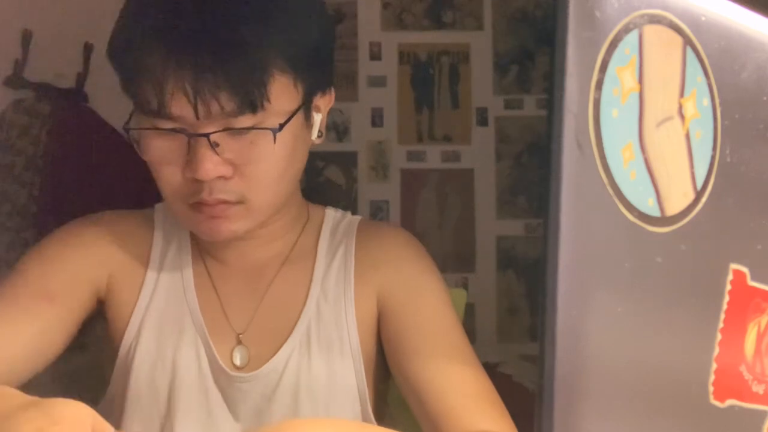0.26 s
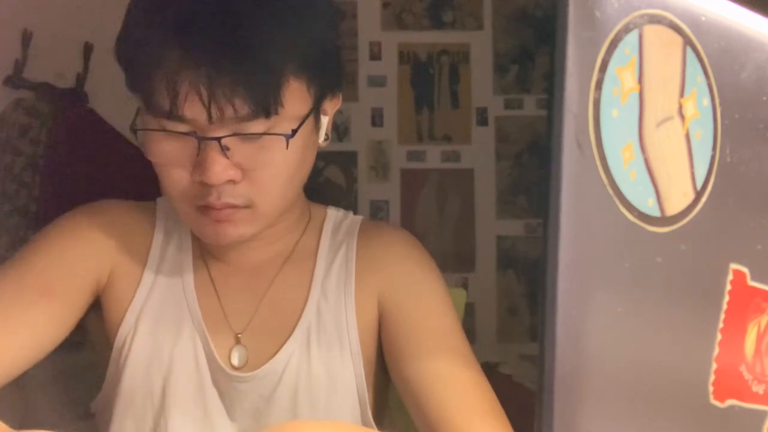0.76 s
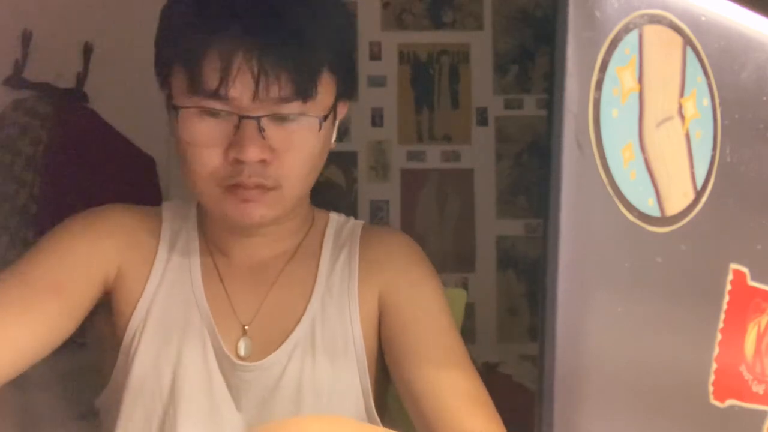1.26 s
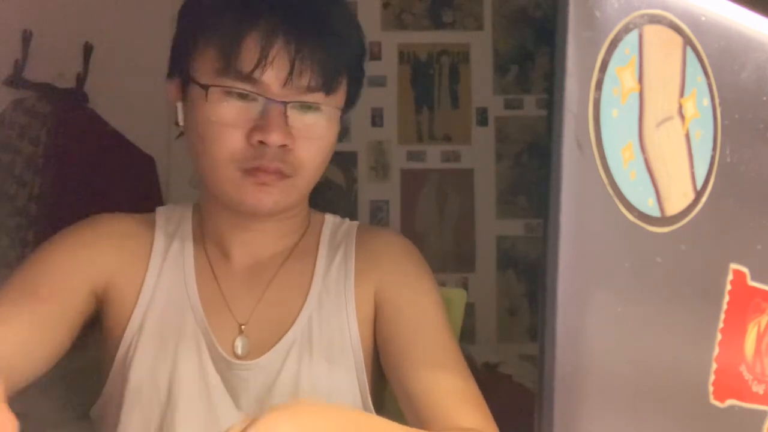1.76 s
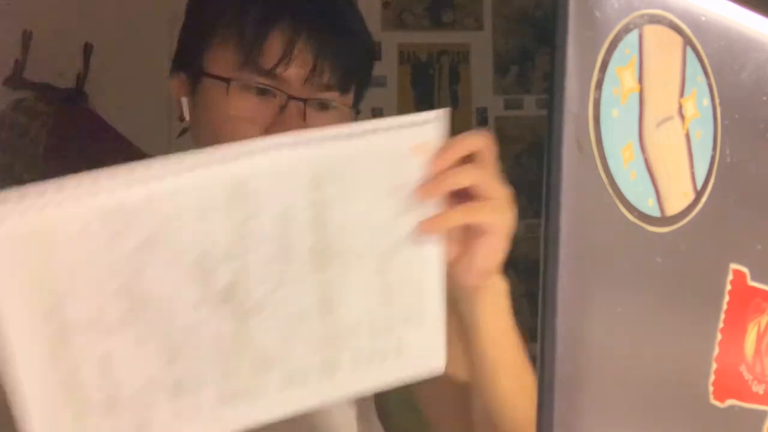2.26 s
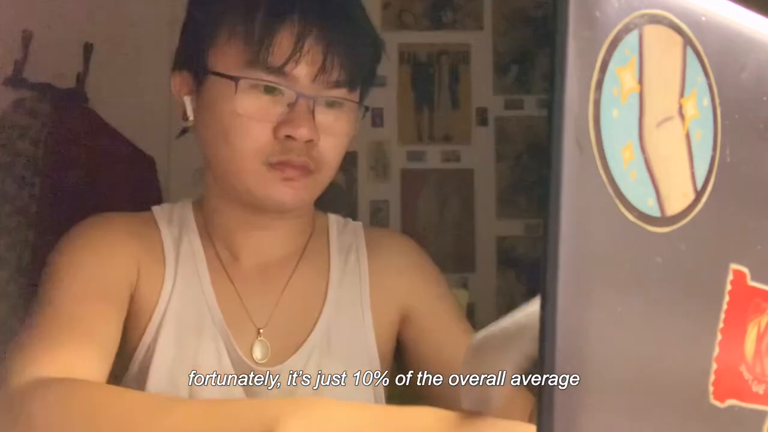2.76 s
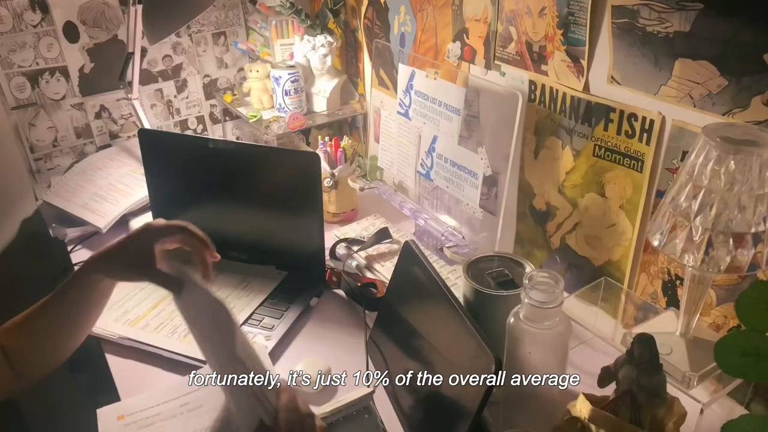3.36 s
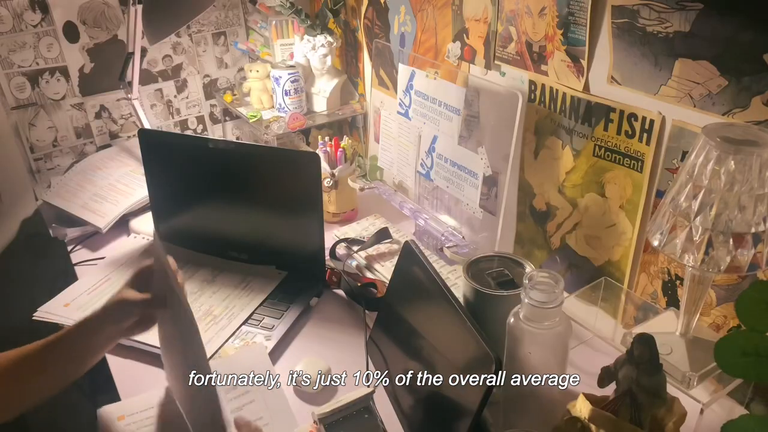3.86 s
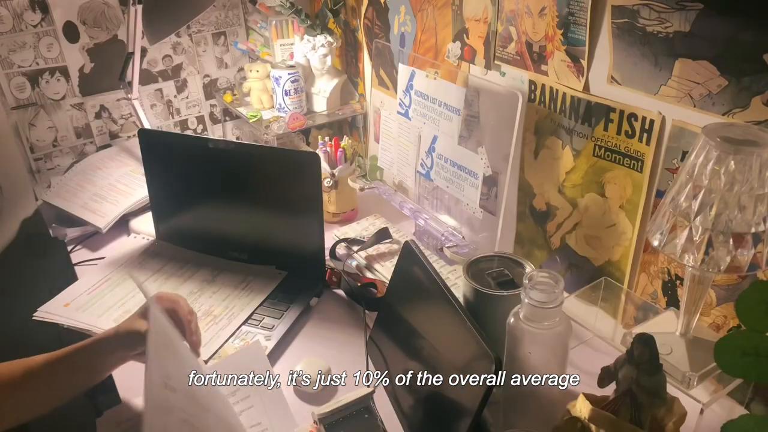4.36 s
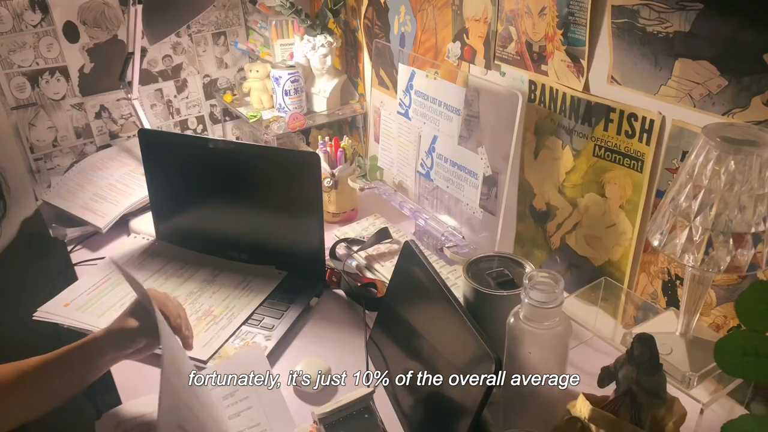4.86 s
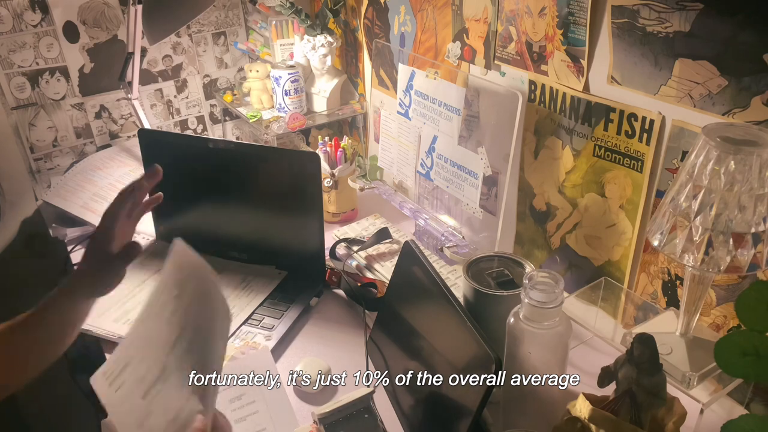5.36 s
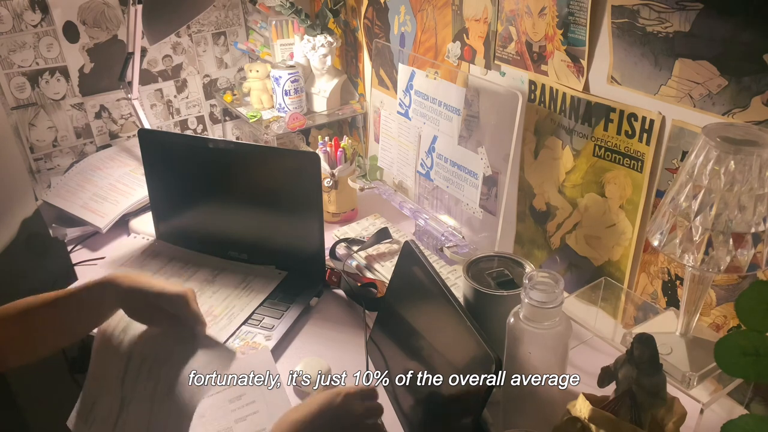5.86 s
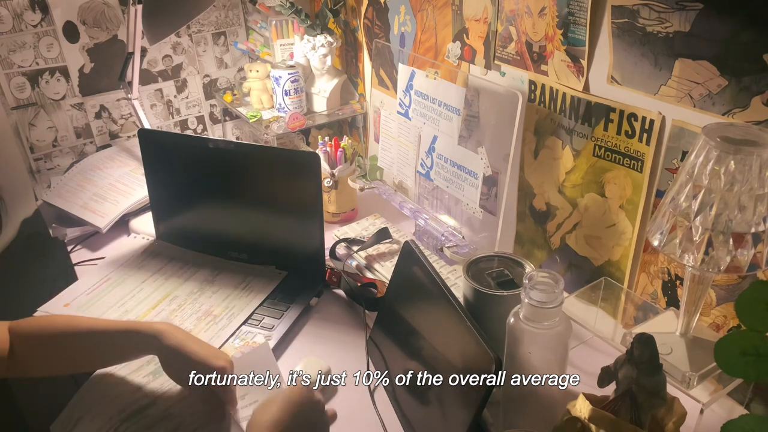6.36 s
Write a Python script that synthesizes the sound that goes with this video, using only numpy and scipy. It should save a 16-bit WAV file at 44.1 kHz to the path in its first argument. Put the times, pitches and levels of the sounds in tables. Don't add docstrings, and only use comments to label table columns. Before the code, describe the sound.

Quiet small room, close stereo desk microphone, low hushed room tone. From 0 to 0.5 s a small printer motor hums softly and low, then stops amid small lever clicks. Around 0.6 s a sharp plastic clack with a dull thump; gear teeth tick at 0.7 and 0.9. At 1.04 to 1.1 s a cluster of very loud, hard latch clacks booms the desk, by far the loudest moment. Gears whirr in short bright rasps with clacks from 1.3 to 1.55. A sheet is lifted from 1.7 to 2.3 with rustle, knocks and thumps; another thump at 2.5, then rubbing palms and small knocks. At 3.1 a knock and the room tone changes. Paper slides and whispers faintly, with flicks at 3.3 and 4.0; a distant motor moans 4.2 to 5.1. Light tap 5.4, soft knocks 5.7 to 5.8, crisp tick 6.07, and a firm paper slap with desk thud at 6.55.

```python
import sys
import numpy as np
from scipy import signal
from scipy.fft import rfft, irfft, next_fast_len
from scipy.io import wavfile
from scipy.ndimage import uniform_filter1d

SR = 44100
rng = np.random.default_rng(int(sys.argv[2]) if len(sys.argv) > 2 else 0)


def invert_db(x):
    u = np.asarray(x, float) / 20
    return 10 ** u


def transcribe(signal):
    frames = np.atleast_2d(signal).T
    limited = np.clip(frames, -1, 1)
    pcm = np.round(limited * 32767).astype(np.int16)
    wavfile.write(sys.argv[1], SR, pcm)


N = 291942
CHANGE_S = 3.11

# pitch_hz, level_db (per Hz)
AIR_1 = [(15, -56.5), (25, -27.5), (140, -4), (183, -15), (221, -3.5), (378, -20.5), (421, -22.5),
         (631, -22.5), (826, -21.5), (4150, -44.5), (5010, -46), (7910, -83), (13200, -69.5),
         (15500, -85.5)]
AIR_2 = [(15, -57), (25, 6), (54, -15), (142, -13.5), (373, -6.5), (499, -16.5), (590, -10.5), (911, -23),
         (1050, -15.5), (1160, -22), (2510, -38), (2830, -42), (6600, -48), (8000, -53), (10400, -66.5),
         (17600, -120)]
AIR_1_DB, AIR_2_DB = -45, -55.5
# time_s, pitch_hz, level_db
MOAN = [
    (4.2, 151.8, -60.5),
    (4.4, 161.2, -49.5),
    (4.54, 159, -49),
    (4.824, 123.5, -62.5),
    (4.998, 135.1, -57),
    (5.072, 141.5, -56.5),
    (5.1, 131, -67.5),
]
# time_s, pitch_hz, level_db
HUM = [
    (0.0, 231, -48),
    (0.164, 231.6, -43.5),
    (0.222, 216, -46.5),
    (0.342, 213.9, -46),
    (0.492, 233, -49),
    (0.5, 232.6, -64),
]
# pitch_hz, level_db, t60_s
CASE = [(650, -6, 0.23), (990, -4, 0.0051), (1176, 1, 0.052), (1400, -9, 0.038), (1700, 6, 0.021),
        (2100, -9.5, 0.097), (2610, 0, 0.025), (3420, -10.5, 0.049), (4500, -15, 0.025), (7050, -29, .02)]
DESK = [(160, -2, 0.11), (227.8, -4.5, 0.23), (283, -8.5, 0.17)]
FRAME = [(69, -1, 0.72), (82.85, 3.5, 0.048)]
GEARS = [(1460, -7.5, .03), (1830, -3, 0.02), (2652, 2, 0.035), (3480, -8.5, 0.011), (4360, -8, 0.025),
         (5160, 2, 0.0043), (6490, 2.5, 0.0072), (8300, -9.5, .012)]
# time_s, level_db
UNREST = [(0.0, -48.5), (.4, -45), (.6, -46), (1.3, -42.5), (1.55, -39), (1.85, -55.5), (2.2, -38),
          (2.42, -56.5), (2.7, -53.5), (3.35, -50), (4.4, -53.5), (6.1, -53.5), (6.4, -57)]
# start_s, length_s, end_db, swell_db, fizz_share_db
FEEDS = [
    (.42, 0.052, -59, 17, -27),
    (.5, 0.1, -60.5, 3, -40),
    (.61, 0.013, -62, -27.5, -32),
    (.7, 0.049, -58.5, -7.5, -26),
    (.89, 0.011, -49.5, -2.5, -3),
    (1.01, 0.024, -38, 10, -19.5),
    (1.045, 0.022, -33, 0.5, -27),
    (1.335, 0.049, -42.5, 6.5, -5),
    (1.415, 0.037, -35.5, 1, 1.5),
    (1.48, 0.022, -37, 6, -1.5),
]
# start_s, length_s, end_db, swell_db,
# fizz_share_db
PAPER_STROKES = [
    (1.66, 0.057, -67.5, -9, -6),
    (1.75, 0.27, -56.5, 8, -7.5),
    (2.09, 0.17, -45.5, 11.5, 1),
    (2.44, 0.051, -63.5, 1, -5.5),
    (2.51, 0.014, -58.5, -13, -27),
                 (3.056, 0.14, -59, -3.5, -5.5), (3.18, 0.15, -50, 21.5, -12), (3.328, 0.34, -67.5, -14, 5.5),
           (3.56, 0.045, -64.5, -1, 4), (3.838, 0.35, -66, 5, -8), (3.969, 0.059, -54, -3.5, 2),
           (4.07, 0.17, -65, -5.5, 2.5), (4.31, 0.035, -55, 8.5, -4.5), (4.39, 0.083, -62.5, 1, 3.5),
           (4.47, 0.11, -62.5, -5.5, -4.5), (4.714, 0.11, -64, -7, 2), (4.86, 0.15, -71, 24, 5),
           (4.997, 0.074, -48, 14, 1), (5.14, 0.032, -56.5, 10, 2), (5.22, 0.034, -65, -6, 3),
           (5.454, 0.021, -72.5, -6.5, -19), (5.62, 0.072, -57, 18, 0.5), (5.705, 0.024, -62.5, -12, -24),
           (5.879, 0.17, -56.5, 14, 4), (6.21, 0.06, -70, -1.5, -22), (6.535, 0.015, -32.5, 14.5, -3.5)]
# start_s, length_s
HUSH = [
    (3.15, .48),
    (3.85, 1.63),
    (5.63, .7),
]
# start_s, length_s, end_db
RUBS = [
    (1.053, 0.058, -36.5),
    (2.524, 0.14, -52),
    (2.709, 0.032, -58.5),
    (2.762, 0.11, -51),
    (2.605, .1, -59),
    (2.891, 0.027, -58),
    (5.61, .06, -78.5),
    (5.696, 0.14, -55),
    (5.786, 0.032, -51.5),
    (5.846, 0.019, -63),
]
# start_s, peak_db, pitch_hz, t60_s
THUMPS = [(0.608, -26.5, 147, 0.12), (0.646, -27.5, 81.1, 0.14), (0.939, -29.5, 88.3, 0.15),
          (1.047, -12, 298.2, 0.12), (1.058, -15, 288, .06), (1.074, -13.5, 305.4, .05),
          (1.086, -6.5, 148.9, 0.1), (1.099, -15, 160, 0.042), (1.143, -22, 150, 0.093),
          (1.088, -12, 286.2, 0.053), (1.116, -15, 60.35, 0.27), (1.421, -31.5, 86, 0.46),
          (1.536, -24.5, 90, 0.35), (2.032, -33.5, 143.2, 0.5), (2.059, -31, 85.6, 0.25),
          (2.158, -26, 148, 0.1), (2.25, -19, 144.4, 0.26), (2.3, -22.5, 90.5, 0.127),
          (2.506, -27, 292, .05), (2.509, -18.5, 147, 0.11), (2.531, -27, 78.5, 0.13),
          (2.545, -27, 292, 0.062), (3.29, -32.5, 151, 0.11), (3.987, -33.5, 276, 0.065),
          (6.55, -19, 147.3, 0.077), (6.553, -24, 276.3, 0.15)]
# centre_s, peak_db, pitch_hz
TICKS = [
    (0.6088, -25, 1600),
    (.7525, -39, 2300),
    (1.083, -3, 3200),
    (1.8964, -42, 1500),
    (2.717, -43, 1900),
    (5.4125, -34, 950),
    (6.0726, -24.5, 2800),
]
# start_s, peak_db, pitch_hz, t60_s
PINGS = [(.485, -28, 2164, 0.025), (.607, -18.5, 1400, 0.019), (.607, -19.5, 2100, 0.022),
         (.896, -31, 2570, .04), (1.015, -33, 2620, .03), (1.015, -45, 3500, 0.027),
         (1.046, -15.5, 610, 0.075), (1.056, -16, 880, 0.036), (1.068, -14, 1608, .05),
         (1.086, -9, 936.5, 0.032), (1.112, -23.5, 900, .08), (1.113, -24, 4470, 0.034),
         (1.148, -38, 4500, .025), (1.352, -31.5, 606, 0.055), (1.371, -32, 630, .05),
         (1.402, -33.5, 644, 0.13), (1.4097, -31.5, 629, 0.063), (1.896, -38, 3100, 0.023),
         (1.996, -36, 790, 0.044), (2.026, -42, 784, .09), (2.149, -39, 2767, 0.044),
         (2.247, -26.5, 1970, 0.036), (2.249, -31, 650, 0.026), (2.505, -29, 1230, 0.029),
         (2.505, -26.5, 1700, 0.024), (2.552, -43, 950, 0.044), (2.575, -38, 523, .05),
         (2.598, -35, 990, .03), (2.667, -42.5, 617, .08), (2.717, -38.5, 622, 0.041),
         (2.783, -45.5, 2900, 0.038), (2.808, -40, 2980, .03), (2.838, -45, 564, 0.047),
         (2.912, -47.5, 1105, 0.027), (2.912, -43, 1800, 0.035), (3.066, -48, 2580, .05),
         (3.118, -32, 1956, 0.064), (3.123, -45, 3000, .03), (5.411, -42, 650, 0.031),
         (5.412, -38, 1123, 0.036), (5.628, -45, 714, 0.052), (5.716, -49, 2630, .04),
         (5.717, -54, 3670, 0.027), (5.83, -47, 1520, .05), (5.835, -58, 2860, .04),
         (5.886, -49, 890, 0.047)]
# start_s, peak_db, snap_db
TEETH = [(0.321, -54, -30), (0.5268, -39.5, -32), (0.54, -46, -32), (0.547, -36, -32), (0.57, -38, -20),
         (0.5851, -40, -22), (0.595, -33, -8), (0.7073, -39, -21), (0.72, -31, -9), (0.735, -42, -13),
         (.7517, -32.5, -11), (.768, -50, -23), (0.894, -28, -13), (.918, -36, -12), (1.421, -33.5, -12),
         (1.432, -34, -14), (1.445, -42, -14), (1.465, -38, -16), (1.519, -31, -5)]
# start_s, peak_db,
# pitch_hz, rattle_t60_s
KNOCKS = [(1.339, -36, 747, 0.085), (1.351, -41, 611, 0.029), (1.362, -37, 4850, 0.15),
          (1.369, -33, 626, 0.031), (1.38, -37, 8600, 0.11), (1.404, -47, 623, 0.09),
          (1.495, -32, 1451, 0.13), (1.68, -48, 3320, 0.12), (1.76, -43, 3380, 0.2),
          (1.845, -46, 3450, 0.11), (1.872, -38.5, 1800, 0.14), (1.8951, -39.5, 1108, 0.04),
          (1.926, -38.5, 1030, 0.16), (1.951, -31.5, 1230, 0.06), (1.996, -27.5, 2100, 0.012),
          (2.595, -30.5, 590, 0.21), (2.621, -29.5, 585, 0.073), (2.716, -36.5, 1830, 0.071),
          (2.731, -33.5, 633, 0.076), (2.733, -39, 1320, 0.085), (2.801, -31.5, 1930, 0.46),
          (2.819, -35.5, 580, 0.16), (2.908, -36.5, 580, 0.045), (3.094, -36, 1560, 0.15),
          (3.118, -23.5, 1420, 0.056), (3.842, -46.5, 1090, 0.18), (5.412, -37, 880, 0.059),
          (5.694, -43.5, 757, 0.032), (5.719, -41.5, 828, 0.25), (5.806, -34, 895, 0.11),
          (5.828, -41.5, 1042, 0.15), (6.04, -49, 2070, 0.047), (6.562, -28, 404, 0.13)]
# start_s, peak_db, pitch_hz, grit_db, snap_db
FLICKS = [(2.15, -31.5, 714, -11, -13), (2.244, -24.5, 1050, 1, -2.5), (2.505, -27, 2610, 2, 1.5),
          (3.286, -34.5, 724, -0.5, -2), (3.986, -26, 580, -11.5, -8), (4.322, -46.5, 1068, -33, 4.5),
          (4.717, -49.5, 1079, -29, 4), (5.015, -43, 1506, -24, -4.5), (5.056, -38.5, 1083, -9, -8),
          (5.323, -41, 1045, 0.5, 0.5), (5.4553, -44, 1065, 5.5, -21), (6.539, -22, 484, -33, 6.5),
          (6.55, -10.5, 510, -21.5, -1.5), (6.557, -46, 686, -11, -14), (6.57, -35, 650, 5, -25)]
# start_s, peak_db, pitch_hz, grit_db, snap_db
SNAPS = [(.6075, -14.5, 1778, -25, -20), (0.609, -15.5, 654, -19, -31), (1.0836, -8.5, 3473, -13, -11),
         (1.9958, -34.5, 3060, -2.5, -9), (2.803, -41, 2900, -23, -26), (5.708, -45, 3530, -10, -14),
         (5.717, -53.5, 1010, 1, -19), (5.751, -48, 1188, -15, -20), (5.807, -46, 2200, -8, -14),
         (6.0733, -32.5, 3170, -9, 12), (6.0727, -27, 3384, -17, -4), (6.074, -36, 6700, -7, 21),
         (6.2166, -44.5, 1455, -20, -10.5)]
# start_s, peak_db, pitch_hz, grit_db, snap_db
CLACKS = [(0.425, -37.5, 1400, 0, -2), (0.4709, -37, 1400, -27, -36), (0.486, -28.5, 604, -3.5, -36),
          (0.751, -39.5, 1700, -5.5, -2), (0.873, -44.5, 1500, -13.5, -32),
          (0.898, -24.5, 1600, -15.5, -11.5), (1.015, -34, 1750, -5, 3), (1.034, -21.5, 2200, -11, -26),
          (1.043, 3, 1700, -15.5, -11.5), (1.0546, -5, 1430, -18, -37), (1.060, -12, 710, -21.5, -33.5),
          (1.068, -12, 1620, -21.5, -37.5), (1.073, -17.5, 2803, -18, -26),
          (1.083, -11.5, 2330, -11, -14.5), (1.082, -2.5, 1400, -13.5, -12.5),
          (1.088, -7, 715, -14.5, -47.5), (1.063, -17.5, 1000, -21, -32), (1.0845, -11.5, 899, -20, -31),
          (1.304, -26.5, 1530, -16, -32), (1.458, -24.5, 2520, -32.5, -16.5), (1.507, -22, 2592, -19, 4)]
# pitch_hz, t60_s
ROOM = [(100, 0.17), (600, 0.22), (2500, 0.19), (8000, 0.16), (15000, 0.13)]
# pitch_hz, level_db
MIC_1 = [(20, -21), (62, 0.5), (6000, 0), (8000, 3.5), (10400, 3), (13000, -6), (15700, -5.5),
         (16700, -61.5)]
MIC_2 = [(20, -66), (45, 1), (4000, 0), (7700, 4), (9300, 3.5), (12400, 0.5), (15700, 0.5), (16700, -51)]
# pitch_hz, likeness (0 to 1)
SAME_1 = [(60, 0.57), (180, 1), (550, 0.16), (1650, 0.5), (4970, .2), (7500, 0.88)]
SAME_2 = [(60, 0.81), (180, 1), (550, 0.28), (1650, 0.39), (4970, 0.18), (7500, 0.29)]
# pitch_hz, likeness (0 to 1)
ECHO_SAME = [(300, .3), (5000, 0), (7500, .8), (20000, .8)]
# pitch_hz, left_over_right_db
LEFT_1 = [(60, 1.5), (180, 4.5), (550, -2), (1650, 0), (4970, 4), (15000, -0.5)]
LEFT_2 = [(60, 2.5), (180, -5), (550, -1), (1650, 1.5), (4970, -3), (15000, -0.5)]
# pitch_hz, left_lead_radians
LEAD_1 = [(100, .5), (350, 1.5), (1200, .7), (4400, .5), (6500, 1.5), (7700, 3.14), (9900, 3.14),
          (11300, 4.5), (12500, 6.28)]
LEAD_2 = [(100, .2), (1700, .8), (6500, -.4), (8250, -3.14), (8950, -3.14), (10450, -6.28), (11650, -6.28),
          (12900, -9.42), (14200, -9.42), (15200, -12.57)]
# pitch_hz, random_lead_radians
SCATTER = [(300, .3), (1500, .55), (5000, .9), (7400, 0), (20000, 0)]


def evened(x):
    return x / np.sqrt(np.mean(x ** 2) + 1e-20)


def read(points, hz):
    f, value = np.transpose(points)
    return np.interp(np.log(hz + 1), np.log(f + 1), value)


def curve(rows, order):
    rows = np.array(rows)
    return np.interp(np.arange(N) / SR, rows[:, 0], rows[:, order])


def band(x, lo_hz, hi_hz):
    return signal.sosfilt(signal.butter(2, [lo_hz, hi_hz], "band", fs=SR, output="sos"), x)


def ringing(modes, seconds, stretch=0.95):
    t = np.arange(int(seconds * SR)) / SR
    return sum(invert_db(db - 60 * t / (t60 * stretch)) * np.sin(2 * np.pi * hz * t) for hz, db, t60 in modes)


def lay_out(events):
    out = np.zeros(N + SR)
    for at, sound in events:
        out[at:at + len(sound)] += sound
    return out[:N]


def room_tone(points, db):
    frames, hz = N // 512 + 5, np.fft.rfftfreq(2048, 1 / SR)
    a, b, c, d, patches = rng.standard_normal((frames, 1025, 5)).T
    patches = evened(uniform_filter1d(uniform_filter1d(patches, 6, 0), 8, 1))
    z = np.array([a + 1j * b, c + 1j * d]) * invert_db(read(points, hz)[:, None] + 0.32 * patches)
    return invert_db(db) * evened(signal.istft(z, nperseg=2048, noverlap=1536)[1][:, :N])


def motor(rows, octave):
    turns = 2 * np.pi * np.cumsum(curve(rows, order=1)) / SR
    t = np.arange(N) / SR
    on = np.clip(np.minimum(t - rows[0][0], rows[-1][0] - t) / 0.023, 0, 1)
    return np.sqrt(2) * on * invert_db(curve(rows, order=2)) * (np.sin(turns) + octave * np.sin(2 * turns))


def far_moan():
    return motor(MOAN, octave=0.29)


def printer_hum():
    return motor(HUM, octave=0.098)


def unrest():
    t = np.arange(N) / SR
    frame_share_db, after_db, after_t60_s, deep_hz = -9.5, -7.5, 0.21, 110
    power = np.outer([1, invert_db(frame_share_db)], invert_db(curve(UNREST, order=1))) ** 2
    for s, db, hz, _ in THUMPS:
        dying_db = db + after_db - 60 * np.maximum(t - s, 0) / after_t60_s
        power[int(hz < deep_hz)] += (t > s) * invert_db(dying_db) ** 2
    return np.sqrt(power)


def shake():
    lumps = evened(uniform_filter1d(rng.standard_normal(N), 900))
    pushes = rng.standard_normal((2, N)) * invert_db(4.6 * lumps)
    top = evened(signal.oaconvolve(pushes[0], ringing(DESK, .3, 0.47))[:N])
    frame = evened(signal.oaconvolve(pushes[1], ringing(FRAME, .4, 0.18))[:N])
    return (unrest() * [top, frame]).sum(axis=0)


def blotchy(x, patch_db):
    z = signal.stft(x, nperseg=256)[2]
    patches = rng.standard_normal(z.shape)
    patches = evened(uniform_filter1d(uniform_filter1d(patches, size=9, axis=-2), size=14, axis=-1))
    return signal.istft(z * invert_db(patch_db * patches), nperseg=256)[1][..., :N]


def strokes(rows):
    t, power = np.arange(N) / SR, np.zeros((2, N))
    grip_s, let_go_db_per_s = 0.021, 305.5
    for start, length, db, swell_db, fizz_db in rows:
        left = start + length - t
        level_db = db - swell_db * np.clip(left / length, 0, 1) + let_go_db_per_s * np.minimum(left, 0)
        gain = np.clip((t - start) / grip_s + .5, 0, 1) * invert_db(level_db)
        power += np.outer([1, invert_db(fizz_db)], gain) ** 2
    return np.sqrt(power)


def tiny_slips():
    slips = blotchy(rng.standard_normal((3, N)), patch_db=4.)
    uneven = evened(uniform_filter1d(rng.standard_normal(N), size=600))
    crackle = np.minimum(rng.exponential(1, N // 48 + 1), 6).repeat(48)[:N]
    return slips * invert_db(1.3 * uneven + 2.2 * crackle)


def slide():
    hush_db, hush_fizz_db = -75, -11.5
    hush = [(*row, hush_db, 0, hush_fizz_db) for row in HUSH]
    feed, feed_fizz = strokes(FEEDS)
    paper, paper_fizz = strokes(PAPER_STROKES + hush)
    palms = strokes([(*row, 0, 0) for row in RUBS])[0]

    slips = tiny_slips()
    scrape = evened(band(slips[0], 2200, 8000))
    gears = evened(signal.oaconvolve(slips[0], ringing(GEARS, .03))[:N])
    case = signal.oaconvolve(slips[1], ringing(CASE, .05, 0.035))[:N]
    body = evened(band(case, 910, 6000))
    dull = evened(band(slips[1], 450, 1300))
    fizz = evened(band(slips[2], 8500, 17000))

    grind = feed * (.4 * scrape + .92 * gears) + paper * scrape
    paper_push = paper ** 2 / (paper + 2 * paper_fizz + 1e-9)
    rub = invert_db(-2) * feed + invert_db(4 + 5.5) * paper_push
    on_tray = np.arange(N) < CHANGE_S * SR
    creep = on_tray * invert_db(-79) * scrape
    creep_fizz = invert_db(-87 + 3 * on_tray - 2.5)
    return grind + creep + dull * palms + rub * body + (feed_fizz + paper_fizz + creep_fizz) * fizz


def thumps():
    t = np.arange(SR // 2) / SR
    swell = 1 - np.exp(-(t / 0.003) ** 2)
    events = []
    for s, db, hz, t60 in THUMPS:
        dying = invert_db(db - 60 * t / np.clip(t60, .03, .4))
        events.append((round(s * SR), swell * dying * np.sin(2 * np.pi * hz * t)))
    return band(lay_out(events), 40, 1500)


def ticks():
    t = np.arange(-200, 200) / SR
    events = []
    for s, db, hz in TICKS:
        bell = np.exp(-(t * hz / .45) ** 2)
        events.append((round(s * SR) - len(t) // 2, invert_db(db) * bell * np.cos(2 * np.pi * hz * t)))
    return lay_out(events)


def pings():
    t = np.arange(SR // 8) / SR
    swell = 1 - np.exp(-(t / 0.0017) ** 2)
    events = []
    for s, db, hz, t60 in PINGS:
        note = np.sin(2 * np.pi * hz * t) + 0.41 * np.sin(2 * np.pi * 0.75 * hz * t)
        dying = invert_db(db - 60 * t / np.clip(t60, .01, .12))
        events.append((round(s * SR), swell * dying * note))
    return lay_out(events)


def teeth():
    t = np.arange(SR // 16) / SR
    dying = invert_db(-60 * t / 0.0027) + .3 * invert_db(-60 * t / 0.036)
    events = []
    for s, db, snap_db in TEETH:
        chatter, fizz = rng.standard_normal((2, len(t)))
        modes = [(f, d + 2.5 * v, t6) for (f, d, t6), v in zip(GEARS, fizz)]
        ring = signal.fftconvolve(chatter * dying, ringing(modes, 0.027))[:len(t)]
        snap = invert_db(snap_db) * band(fizz, 8500, 16500) * dying
        events.append((round(s * SR), invert_db(db) * (ring / abs(ring).max() + snap)))
    return lay_out(events)


def blow(db, hz, grit_db, snap_db, t60):
    t = np.arange(SR // 8) / SR
    shakes, grit, fizz = rng.standard_normal((3, len(t)))
    soft = np.clip(-grit_db / 40, 0, 1)
    rise = 1 - np.exp(-t / (.0004 + .005 * soft ** 3))
    dying = rise * invert_db(-60 * t / np.clip(t60, .008, .15))
    crack = rise * invert_db(-60 * t / (0.0016 + 0.008 * soft))
    force = shakes * (crack + 0.25 * dying)
    case = [(f * (1 + .07 * u), d + 3 * v - 14 * soft * abs(np.log2(f / hz)), t6)
            for (f, d, t6), u, v in zip(CASE, grit, fizz)]
    rings = ringing([(hz, 8, .012)], .08) + ringing(case, .08, 0.31)
    spot = signal.fftconvolve(force, rings)[:len(t)]
    lo_hz = max(0.69 * min(hz, 600), 0.43 * hz)
    hi_hz = hz * (2.1 + 6 * (1 - soft) ** 2) * .5 + 600
    spot = band(spot, lo_hz, hi_hz)
    bright = invert_db(grit_db) * band(grit, 2500, 8000) + invert_db(snap_db) * band(fizz, 8500, 16500)
    bright *= 4.47 * crack + .5 * dying
    return invert_db(db) * (spot / abs(spot).max() + bright)


def knocks():
    return lay_out([(round(s * SR), blow(db, hz, -27, -35.5, t60)) for s, db, hz, t60 in KNOCKS])


def flicks():
    return lay_out([(round(s * SR), blow(*row, t60=0.063)) for s, *row in FLICKS])


def snaps():
    return lay_out([(round(s * SR), blow(*row, t60=0.01)) for s, *row in SNAPS])


def clacks():
    return lay_out([(round(s * SR), blow(*row, t60=0.029)) for s, *row in CLACKS])


def room(x):
    taps = np.zeros((2, SR // 2))
    at = np.arange(160, SR // 2 - 20, 20) + rng.integers(0, 20, (2, (SR // 2 - 161) // 20))
    np.put_along_axis(taps, at, rng.choice([-1., 1.], at.shape), 1)
    hz, t, z = signal.stft(taps, SR, nperseg=256)
    tail = signal.istft(z * invert_db(-60 * t / read(ROOM, hz)[:, None]), SR, nperseg=256)[1]
    return signal.fftconvolve(x[None], tail / np.linalg.norm(tail[0]), axes=1)[:, :N]


def place(desk, echo, tone, same, left_db, lead, mic):
    size = next_fast_len(N)
    hz = np.fft.rfftfreq(size, 1 / SR)
    left = right = rfft(desk, size)
    for pair, table in ((tone, same), (echo, ECHO_SAME)):
        like = np.clip(read(table, hz), 0, 1)
        a, b = rfft(pair, size)
        left = left + a
        right = right + like * a + np.sqrt(1 - like ** 2) * b
    wander = rng.standard_normal(len(hz))
    wander = evened(uniform_filter1d(uniform_filter1d(wander, size=900), size=900))
    phase = read(lead, hz) + read(SCATTER, hz) * wander
    half = invert_db(read(left_db, hz) / 2)
    pair = np.array([left * half * np.exp(1j * phase), right / half])
    return irfft(pair * invert_db(read(mic, hz)), size)[:, :N]


def scene():
    desk = far_moan() + printer_hum() + shake() + slide() + thumps() + ticks() + pings() + teeth()
    desk += knocks() + flicks() + snaps() + clacks()
    echo = invert_db(-7.5) * room(desk)
    first = place(desk, echo, room_tone(AIR_1, AIR_1_DB), SAME_1, LEFT_1, LEAD_1, MIC_1)
    second = place(desk, echo, room_tone(AIR_2, AIR_2_DB), SAME_2, LEFT_2, LEAD_2, MIC_2)
    share = np.clip((np.arange(N) / SR - CHANGE_S) / 0.012 + .5, 0, 1)
    return (1 - share) * first + share * second


def band_limit(x):
    return signal.sosfilt(signal.butter(12, 16500, fs=SR, output="sos"), x)


def record(dry):
    mix = 0.92 * np.tanh(dry / 1.138)
    return band_limit(mix)


dry = scene()
out = record(dry)
transcribe(out)
```